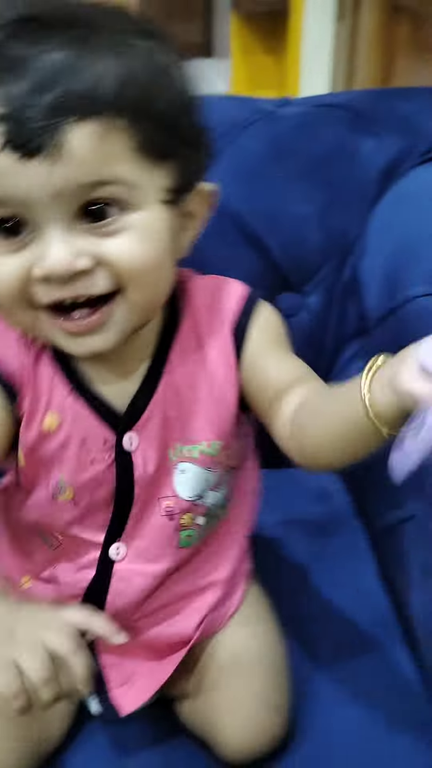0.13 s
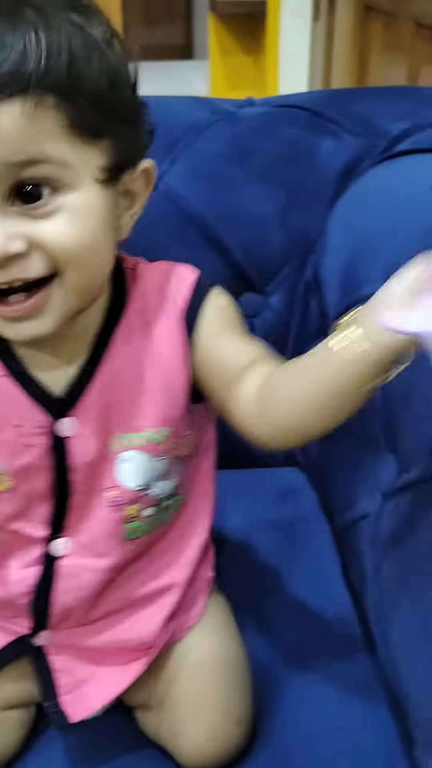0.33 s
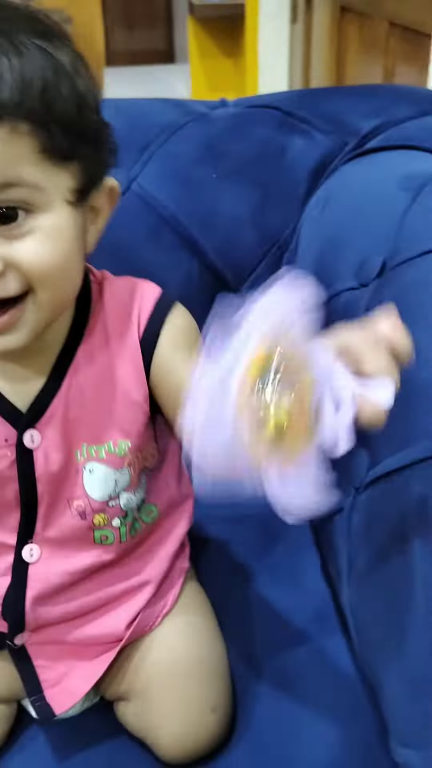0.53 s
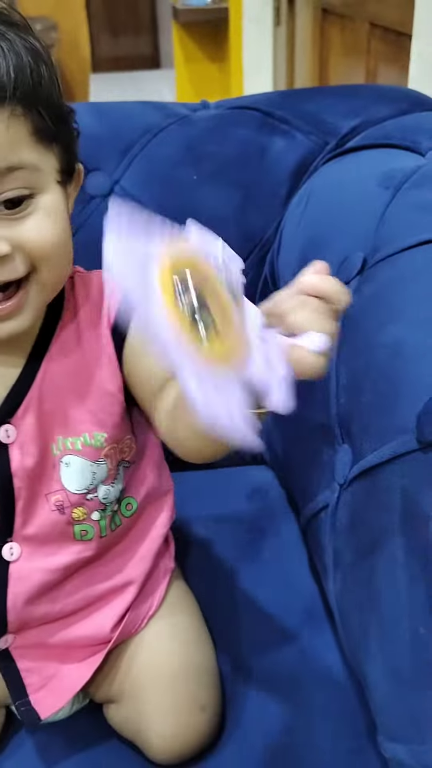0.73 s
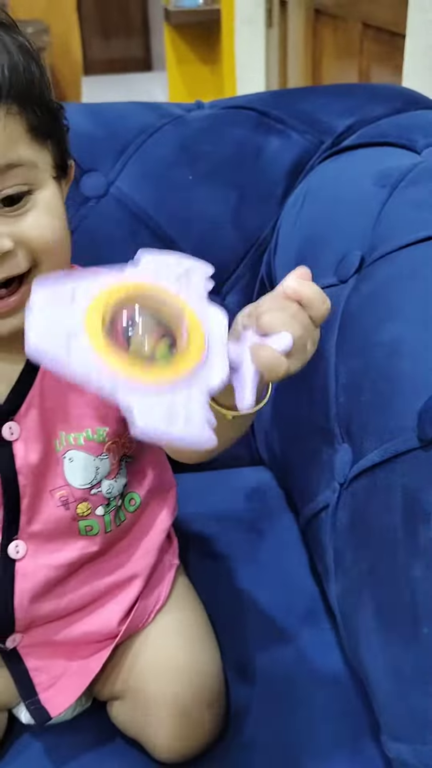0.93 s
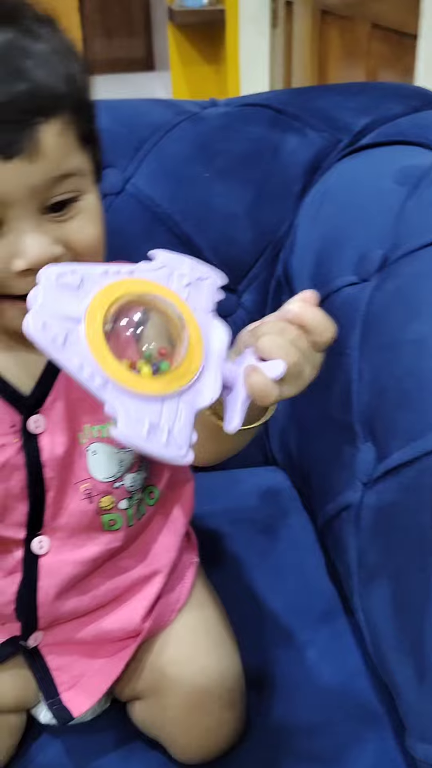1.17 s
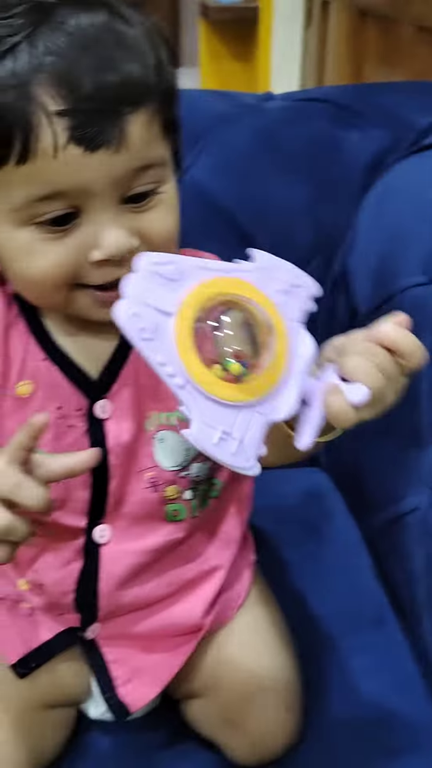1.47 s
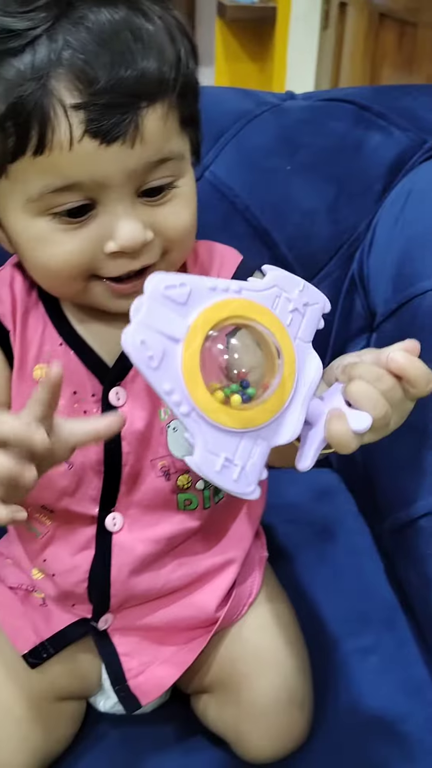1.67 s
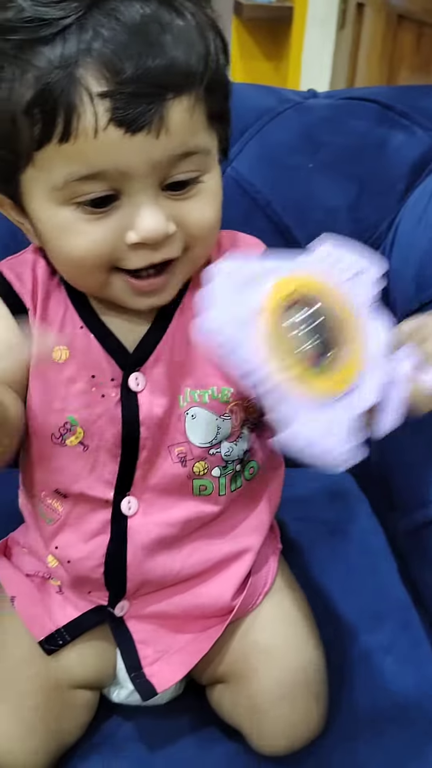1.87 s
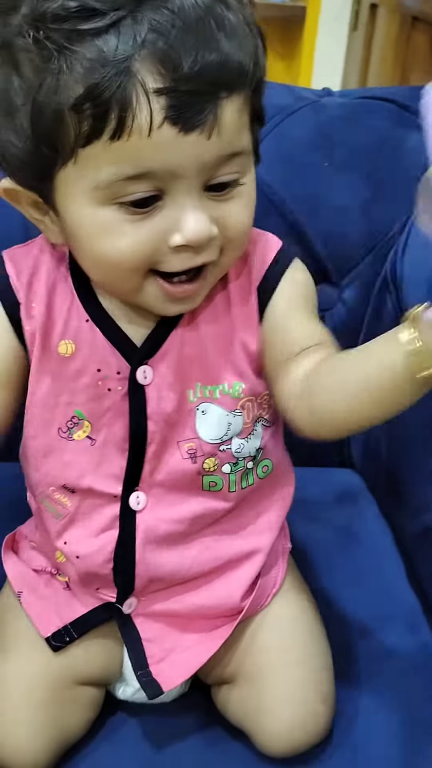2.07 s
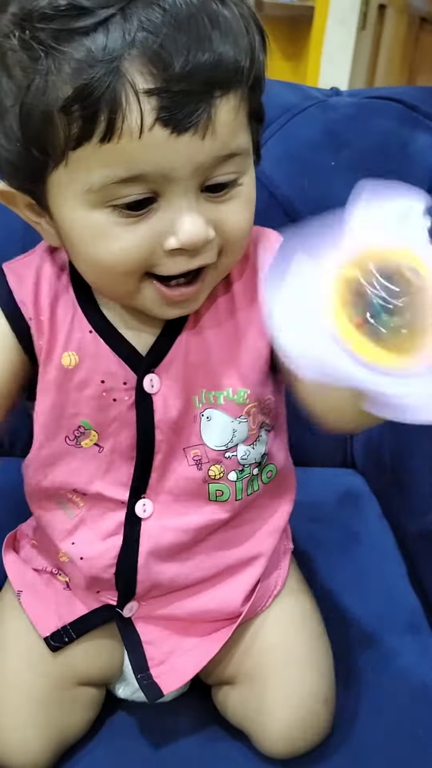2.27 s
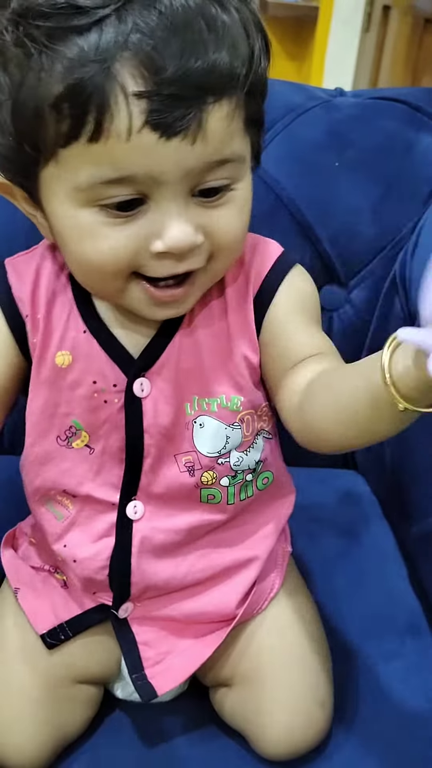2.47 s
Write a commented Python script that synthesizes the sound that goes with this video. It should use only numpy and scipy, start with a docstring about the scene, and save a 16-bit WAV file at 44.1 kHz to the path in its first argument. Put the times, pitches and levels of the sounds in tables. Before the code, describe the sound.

A plastic rattle full of tiny beads is shaken in two dry, hissing bouts in a living room

```python
"""Plastic bead rattle

A plastic rattle with loose beads is shaken in two bouts, left of a two-port microphone in a living room.
Each bead hit is a brief tick, with a weaker rebound, ringing the shell's high modes.
Between the bouts a few beads still tick; beads rolling along the wall rub its lower modes with noise.
Under it lies an unevenly surging room hum: shaped noise bands plus narrow resonances.
A gate lowers everything while the treble is quiet, and the top is cut."""
import sys
import numpy as np
from scipy import signal
from scipy.io import wavfile

SR = 44100
rng = np.random.default_rng(int(sys.argv[2]) if len(sys.argv) > 2 else 0)


def wav_record(signal):
    """Record a signal, one row per channel, as 16-bit PCM in the file named by sys.argv[1]."""
    frames = np.transpose(np.atleast_2d(signal))
    bounded = np.clip(frames, -1, 1)
    # unit amplitude maps onto the largest positive 16-bit level
    quanta = np.round(bounded * 32767).astype(np.int16)
    wavfile.write(sys.argv[1], SR, quanta)


N = 114660   # 2.6 s
RIGHT_LAG_S = .00037   # right port hears rattle and hum later


def from_db(db):
    """Decibels to gain."""
    return 10 ** (np.asarray(db) / 20)


def rms_one(x):
    """Scale to rms 1."""
    return x / np.sqrt(np.mean(x ** 2) + 1e-20)


def at_hz(points, hz):
    """Read a spectrum table on a log-frequency axis."""
    table_hz, value = np.array(points).T
    return np.interp(np.log(hz), np.log(table_hz), value)


def over_time(s, values):
    """Interpolate a time table to every sample."""
    return np.interp(np.arange(N) / SR, s, values)


def drift(corner_hz):
    """Random fluctuation of rms 1: noise through two equal poles, computed every 40 samples."""
    step = 40
    r = np.exp(-2 * np.pi * corner_hz * step / SR)
    noise = rng.standard_normal(N // step + 2002)
    slow = signal.lfilter([1], [1, -2 * r, r * r], noise)[2000:]   # drop the run-in
    return np.interp(np.arange(N) / step, np.arange(len(slow)), rms_one(slow))


def ring(drive, hz, t60_s):
    """One resonance passed twice: a click gives a rounded burst of height about 1."""
    r = from_db(-60 / (max(t60_s, .001) * SR))   # t60 of one pass, 1 ms at least
    w = 2 * np.pi * hz / SR
    poles = [1, 0, 0, 1, -2 * r * np.cos(w), r * r]
    height = 2 * np.e * (1 - r) * np.sin(w) ** 2
    return height * signal.sosfilt([poles, poles], drive + 1e-18)


# vigour of the shaking: t/s, relative level/dB, left minus right/dB
SHAKING = [(0, -31.5, 3), (0.06, -32, 3), (0.1, -26.5, 2.5), (0.14, -25, 3.5), (0.2, -30.5, 4),
           (0.24, -23.5, 7), (0.27, -24, 0), (0.3, -23.5, 8), (0.34, -27.5, 5), (0.39, -34, 4),
           (0.43, -31, 7), (0.48, -29, 4), (0.52, -23, 0.5), (0.57, -26.5, 1.5), (0.61, -29, 3),
           (0.635, -27.5, 8), (0.655, -27.5, 3), (0.69, -24, 8), (0.75, -30, 3), (0.82, -32.5, 8),
           (0.87, -39.5, 6), (0.92, -35.5, 1), (0.97, -35, 1), (1.04, -31.5, 9), (1.1, -33.5, 3),
           (1.17, -41, 3.5), (1.29, -42.5, 2.5), (1.35, -54.5, 3), (1.42, -56, 1), (1.456, -52.5, 5),
           (1.52, -55, 1), (1.6, -54.5, 1.6), (1.65, -51, 1), (1.72, -55.5, 5), (1.85, -65, 4),
           (1.96, -67, 0), (2.06, -58, 14.5), (2.12, -55.5, 11), (2.15, -47.5, 10), (2.165, -41.5, 4),
           (2.22, -35, 10), (2.29, -41.5, 3), (2.315, -37, 11), (2.333, -24, 17.5), (2.36, -30.5, 2),
           (2.41, -28.5, 12), (2.46, -33.5, 7), (2.52, -32.5, 5), (2.6, -33.5, 0)]
SWARM_DB = 2.5   # added to the table
TICKS_PER_S, TICK_SPREAD_DB = 1800, 2.8   # median rate; mean of the exponential size draw before its cap
CLUMP_DB, CLUMP_HZ = 1.5, 59.47   # fluctuation of the tick rate: rms, corner


def swarm():
    """Beads tumble and tick at random, in clumps, mostly small with a few large."""
    s, level_db, pan_db = np.transpose(SHAKING)
    chance = rng.random(N)
    size = np.minimum(rng.exponential(1, N), 4)
    ticks_per_s = TICKS_PER_S * from_db(CLUMP_DB * drift(CLUMP_HZ))
    born = np.flatnonzero(chance < ticks_per_s / SR)
    left, right = shell(born / SR, from_db(TICK_SPREAD_DB * size[[born, born]]))
    level = SWARM_DB + over_time(s, level_db)
    half_pan = over_time(s, pan_db) / 2
    return from_db([level + half_pan, level - half_pan]) * [rms_one(left), rms_one(right)]


# single bead hits that stand out, from loud ones to the small ticks of the pause:
# t/s, relative level/dB, left minus right/dB
SINGLE_HITS = [(0.0447, -15.3, 8.7), (0.0714, -14.1, 6.7), (0.1415, -12.6, -4.4), (0.2406, -9.6, -2.7),
               (0.2442, -9.6, 11.8), (0.2611, -10.9, -0.3), (0.2682, -12.9, -4.9), (0.2856, -6.9, 11.9),
               (0.2995, -8.5, 10.8), (0.3081, -10.1, 15.2), (0.3109, -10.5, 12.1), (0.3166, -8.5, 14.0),
               (0.3244, -10.2, 8.4), (0.3403, -13.0, 16.7), (0.3536, -17.1, 14.2), (0.3634, -15.6, 14.2),
               (0.371, -13.5, 9.2), (0.393, -18.3, 8.9), (0.3997, -13.1, 9.4), (0.4202, -12.0, 17.2),
               (0.4218, -16.8, 10.2), (0.441, -15.7, 11.5), (0.4425, -13.6, 15.9), (0.4632, -14.6, 14.1),
               (0.4871, -13.2, 14.4), (0.4957, -15.5, 10.2), (0.5005, -11.7, 16.3), (0.5049, -12.9, 10.3),
               (0.5096, -15.0, 13.4), (0.5122, -10.8, 11.4), (0.5196, -12.7, 10.4), (0.5212, -11.5, 13.2),
               (0.5317, -11.3, 8.7), (0.5392, -7.9, 12.6), (0.5412, -13.2, 13.1), (0.5593, -12.9, 10.1),
               (0.5698, -17.0, 13.9), (0.5769, -13.1, 9.6), (0.5839, -15.6, 11.2), (0.5856, -11.0, 11.5),
               (0.5932, -13.8, 12.0), (0.597, -14.6, 12.2), (0.6146, -10.4, 13.7), (0.6211, -13.6, 12.8),
               (0.6262, -9.1, 10.7), (0.6281, -6.8, 12.1), (0.6372, -4.7, 9.3), (0.6395, -10.9, 0.6),
               (0.6557, -9.3, 3.1), (0.6698, -7.7, -5.4), (0.6943, -10.4, -2.8), (0.6965, -9.1, -1.1),
               (0.7109, -11.1, 7.6), (0.7163, -11.6, -3.8), (0.7244, -12.3, 12.7), (0.7316, -11.9, 7.7),
               (0.748, -11.5, 1.9), (0.7786, -13.8, 11.8), (0.7804, -15.3, 10.4), (0.7881, -17.4, 12.9),
               (0.8026, -15.1, 10.4), (0.8222, -18.7, 18.3), (0.8243, -16.4, 11.2), (0.8289, -18.9, 16.7),
               (0.8408, -17.9, 21.3), (0.8442, -18.8, 11.3), (0.8555, -20.0, 12.8), (0.8715, -23.6, 15.3),
               (0.8742, -4.0, 10.5), (0.8757, -16.0, 3.1), (0.8972, -7.5, 7.5), (0.8985, -18.4, -0.4),
               (0.9071, -16.6, 8.0), (0.9163, -10.9, 18.0), (0.9328, -16.1, 13.9), (0.9346, -8.0, 12.7),
               (0.9449, -14.9, 12.9), (0.9483, -15.3, 12.5), (0.976, -9.0, 12.0), (0.9777, -12.8, 8.2),
               (0.9991, -17.6, 14.7), (1.0032, -11.5, 14.5), (1.0109, -13.5, 15.6), (1.0253, -18.0, 13.1),
               (1.0287, -17.2, 12.0), (1.0402, -15.3, 17.1), (1.0499, -15.7, 11.3), (1.0632, -15.1, 14.6),
               (1.0658, -15.0, 11.4), (1.0789, -16.7, 15.7), (1.0932, -20.2, 14.4), (1.1139, -19.3, 15.1),
               (1.1335, -24.0, 10.0), (1.1468, -21.5, 6.1), (1.16, -26.0, 10.0), (1.174, -27.0, 10.0),
               (1.217, -27.0, 10.0), (1.2291, -25.4, 10.8), (1.241, -27.0, 10.0), (1.2591, -26.7, 11.6),
               (1.2706, -27.6, 12.9), (1.4501, -34.0, 11.6), (1.4555, -37.0, 8.0), (1.467, -38.0, 8.0),
               (1.552, -40.0, 6.0), (1.627, -38.0, 8.0), (1.736, -38.0, 6.0), (1.762, -41.0, 6.0),
               (1.815, -41.0, 6.0), (1.937, -40.0, 6.0), (2.156, -27.0, 9.0), (2.1696, -24.7, 9.2),
               (2.1809, -22.8, 6.9), (2.1877, -15.5, 8.2), (2.1966, -20.9, 10.8), (2.2152, -18.9, 17.2),
               (2.2246, -19.8, 9.8), (2.231, -17.1, 10.8), (2.2424, -21.1, 13.1), (2.2442, -22.3, 13.5),
               (2.2552, -20.7, 10.4), (2.2694, -20.5, 10.9), (2.2823, -23.8, 15.2), (2.3095, -22.0, 10.5),
               (2.3238, -12.1, 10.4), (2.333, -5.0, 9.7), (2.3364, -7.7, 11.0), (2.3378, -5.0, 10.6),
               (2.3788, -9.7, 12.6), (2.3956, -8.1, 7.3), (2.4008, -10.1, 15.2), (2.4085, -7.1, 10.4),
               (2.4103, -9.4, 6.7), (2.4211, -10.6, 11.2), (2.4242, -12.5, 10.3), (2.4362, -12.0, 8.1),
               (2.4427, -9.5, 10.9), (2.4441, -15.0, -1.9), (2.4514, -17.0, 14.2), (2.4798, -13.2, 2.9),
               (2.4868, -20.5, -7.5), (2.5004, -13.9, 6.7), (2.5022, -13.3, 11.7), (2.508, -17.8, 12.3),
               (2.5153, -15.9, 8.4), (2.5409, -13.9, 17.1), (2.5511, -14.6, -0.9), (2.58, -11.9, 8.2),
               (2.5881, -8.0, 11.0)]
HIT_DB = -2.0   # added to the table


def hits():
    """Single beads strike the shell at listed times, from loud hits to the small ticks of the pause."""
    s, hit_db, pan_db = np.transpose(SINGLE_HITS)
    level = HIT_DB + hit_db
    return shell(s, from_db([level + pan_db / 2, level - pan_db / 2]))


# shell modes at each port: f/Hz, left relative level/dB, right relative level/dB, one-pass t60/s
SHELL_MODES = [(7200, -33, -10, 0.0012), (7670, -48, -19.5, 0.004), (8210, -28.5, 2.5, 0.00093),
               (10260, -5, -25, 0.0013), (10226, -7, -9, 0.0047), (10210, 10, 10.5, 0.00046),
               (10670, -10, -11, 0.0055), (10840, -5, -3.5, 0.0007), (11950, 2, -23, 0.0004),
               (12440, -7.5, 4, 0.00073), (14900, -12, -6, 0.0012), (15600, -3.5, -9, 0.0006)]
LAG_SPREAD_S = .00004
BOUNCE_S, BOUNCE_DB = .0013, -9.0   # rebound: median delay, level re tick
MODE_SPREAD_DB = 3.0   # how a tick's colour varies
PORTS_ALIKE = 0.6   # how alike the two ports get a tick
TURN_DB, TURN_HZ = 3, 1.3   # as the rattle turns, each mode swells and fades: rms, corner
DETUNE = .01   # landing spot shifts the modes down, not at all or up by this share
HARD_ABOVE_HZ = 6160   # the tiny beads excite little below


def shell(s, size):
    """Ticks (sizes: left, right) and rebounds split among the modes at random, partly alike at the ports."""
    luck = rng.standard_normal((len(s), 2, len(SHELL_MODES) * 4 + 3))
    bounce_s = BOUNCE_S * np.exp(0.28 * luck[:, 0, -1])
    s = np.stack([s, s + bounce_s], axis=1).ravel()
    size = (size[:, :, None] * [1, from_db(BOUNCE_DB)]).reshape(2, -1)
    late = s + RIGHT_LAG_S + LAG_SPREAD_S * luck[:, :, -2].ravel()
    spot = np.digitize(luck[:, :, -3].ravel(), [-.43, .43]) - 1   # -1, 0, 1 about equally often
    common, other, flip, flip_other = luck[:, :, :-3].reshape(len(s), -1, 4).T
    turn_db = TURN_DB * np.array([drift(TURN_HZ) for _ in SHELL_MODES])
    modes_hz, left_db, right_db, modes_t60_s = np.transpose(SHELL_MODES)

    out = np.zeros((2, N))
    for port, (when, mode_db, share) in enumerate([(s, left_db, 1), (late, right_db, PORTS_ALIKE)]):
        at = np.clip(np.round(when * SR).astype(int), 0, N - 1)
        own = np.sqrt(1 - share ** 2)
        colour_db = MODE_SPREAD_DB * (share * common + own * other)
        strength = from_db(mode_db[:, None] + colour_db + turn_db[:, at])
        strength = strength / np.sqrt(np.sum(strength ** 2, axis=0))
        strength = strength * np.sign(share * flip + own * flip_other)
        for gain, hz, t60_s in zip(strength, modes_hz, modes_t60_s):
            for k in (-1, 0, 1):
                clicks = np.bincount(at, size[port] * gain * (spot == k), N)
                out[port] += ring(clicks, hz * (1 + DETUNE * k), t60_s)
    return signal.sosfilt(signal.butter(6, HARD_ABOVE_HZ, "high", fs=SR, output="sos"), out)


# low shell modes rubbed by rolling beads: f/Hz, relative level/dB, one-pass t60/s
RUBBED_MODES = [(4600, -7, .0015), (5200, 0, .002), (6000, -3, .0012), (6800, -1, .0012)]
ROLL_DB, ROLL_FOLLOWS = -52, 0.28   # offset at a vigour of -30 dB; share of the vigour's swing
ROLL_FLICKER_DB, ROLL_FLICKER_HZ = 2.0, 35   # rms, corner


def rolling():
    """Beads sliding along the wall rub the low modes with flickering noise, different at each port."""
    s, vigour_db, _ = np.transpose(SHAKING)
    rub = rng.standard_normal((2, N)) * from_db(ROLL_FLICKER_DB * drift(ROLL_FLICKER_HZ))
    rubbed = sum(from_db(db) * rms_one(ring(rub, hz, t60_s)) for hz, db, t60_s in RUBBED_MODES)
    level_db = ROLL_DB + ROLL_FOLLOWS * (over_time(s, vigour_db) + 30)
    return from_db(level_db) * rms_one(rubbed)


ROOM_T60_S, ROOM_DB = .18, -12.0   # tail energy re direct sound


def room(x):
    """Add a diffuse tail: convolution with decaying noise, different for each port."""
    t = np.arange(SR // 2) / SR
    tail = rng.standard_normal((2, len(t))) * from_db(-60 * t / ROOM_T60_S) * (t > .003)
    tail = from_db(ROOM_DB) * tail / np.sqrt(np.sum(tail ** 2, axis=1, keepdims=True))
    return x + signal.fftconvolve(x, tail, axes=1)[:, :N]


# room hum spectrum: f/Hz, relative level/dB per Hz
HUM_SPECTRUM = [(24, -62), (40, -20), (69, -16), (87, -7), (204, -8), (220, -6), (249, -2), (283, -6.5),
                (412, -3.5), (510, -6.5), (560, -10), (831, -9), (1240, -10), (1370, -10.5), (2320, -13.5),
                (4680, -23.5), (10200, -14.5), (16000, -58)]
# correlation of the ports apart from the lag: f/Hz, likeness/1
PORT_LIKENESS = [(60, 0.97), (200, 1), (400, 1), (700, 0.16), (1300, 0.37), (3000, 0.45), (8000, 0.39)]
# hum balance: f/Hz, left minus right/dB
HUM_PAN = [(60, 3), (180, -3.5), (550, -1.5), (1650, 0), (4970, 1), (15000, 4.5)]
HUM_DB = -45.5   # rms of the noise bands before the gate
HUM_PATCHY_DB, HUM_PATCHY_HZ = 1.1, 36   # fluctuation per band: rms, corner


def hum():
    """Quarter-octave bands of stereo noise, most alike at the ports in the bass; the right lags."""
    out, edges_hz = 0, 30 * 2 ** np.arange(0, 9.3, 1 / 4)
    white = rng.standard_normal((2, 2, N + SR // 2))   # with a run-in
    for k, (low, high) in enumerate(zip(edges_hz, edges_hz[1:])):
        band = signal.butter(2, [low, high], "band", fs=SR, output="sos")
        mid, side = signal.sosfilt(band, white[k % 2])[:, -N:]   # neighbours use separate noise
        hz = np.sqrt(low * high)
        alike = np.clip(at_hz(PORT_LIKENESS, hz), -1, 1)
        half_pan = at_hz(HUM_PAN, hz) / 2
        level_db = at_hz(HUM_SPECTRUM, hz) + HUM_PATCHY_DB * drift(HUM_PATCHY_HZ)
        gain = from_db(level_db) * from_db([[half_pan], [-half_pan]]) * surge(hz)
        out = out + gain * (np.sqrt(1 + alike) * mid + np.sqrt(1 - alike) * side * [[1], [-1]])
    out[1] = np.roll(out[1], int(RIGHT_LAG_S * SR))
    return from_db(HUM_DB) * rms_one(out)


# resonances standing out of the hum: f/Hz, rms level before surge and gate/dB, one-pass t60/s
HUM_RESONANCES = [(101.1, -63, 0.19), (127, -64.5, 0.33), (194.1, -64, 0.18), (245.1, -63.5, 0.13),
                  (435.6, -59.5, 0.14), (498.5, -65, 0.11), (1625, -61, 0.029), (2320, -62, 0.019)]


def hum_tones():
    """Noise through narrow resonances, most alike at the ports in the bass; the right lags."""
    out = 0
    for hz, db, t60_s in HUM_RESONANCES:
        noise = rng.standard_normal((2, N + SR))   # with a run-in
        mid, side = rms_one(ring(noise, hz, t60_s)[:, SR:])
        alike = np.clip(at_hz(PORT_LIKENESS, hz), 0, 1)
        right = np.roll(alike * mid + np.sqrt(1 - alike ** 2) * side, int(RIGHT_LAG_S * SR))
        out = out + from_db(db) * surge(hz) * np.array([mid, right])
    return out


# uneven surging of the low hum: t/s, low band relative level/dB, middle band/dB, high band/dB
HUM_SURGE = [(0, -7, -4.5, -0.5), (.16, 4, 2.5, 1), (.24, -1, -1.5, -1), (.36, 3.5, 1, 0),
             (.54, -1, -1.5, -0.5), (.7, -2, -3, -5), (.83, 4, 3, -2.5), (1.05, 1.5, 2, -1.5),
             (1.2, 1, -0.5, -0.5), (1.36, -1.5, 2, 1), (1.7, -3, -2.5, -3), (1.96, 0, 3.5, 0.5),
             (2.12, -1.5, -1, 3), (2.19, 1, 4, -1), (2.28, 2, 0, 2.5), (2.45, -0.5, -1.5, 0),
             (2.57, 1, 0, -0.5)]
# upper edges of those three bands: f/Hz
SURGE_TOPS_HZ = (160, 330, 560)


def surge(hz):
    """Gain over time of the hum at this frequency; steady above the top band."""
    s, *levels_db = np.transpose(HUM_SURGE)
    band = np.searchsorted(SURGE_TOPS_HZ, hz)
    return from_db(over_time(s, levels_db[band])) if band < len(levels_db) else 1


def scene():
    """Rattle in the room, over the hum."""
    return room(swarm() + hits() + rolling()) + hum() + hum_tones()


GATE_AT_DB, GATE_KNEE_DB, GATE_DEPTH_DB = -45, 1.5, -5.5   # treble level at half depth, softness, full cut
GATE_LISTEN_S, GATE_ABOVE_HZ = 0.0073, 6700
CUTOFF_HZ = 15700


def record(dry):
    """A gate lowers the gain while the treble is quiet; a steep low-pass cuts the top."""
    treble = signal.sosfilt(signal.butter(2, GATE_ABOVE_HZ, "high", fs=SR, output="sos"), dry)
    power = np.mean(treble ** 2, axis=0)
    r = np.exp(-1 / (GATE_LISTEN_S * SR))
    smooth_power = signal.lfilter([1 - r], [1, -r], power, zi=[power[:2000].mean()])[0]
    level_db = 10 * np.log10(smooth_power + 1e-12)
    cut_db = GATE_DEPTH_DB / (1 + np.exp((level_db - GATE_AT_DB) / GATE_KNEE_DB))
    gated = dry * from_db(cut_db)
    return signal.sosfilt(signal.ellip(10, .5, 65, CUTOFF_HZ, fs=SR, output="sos"), gated)


dry = scene()
out = record(dry)
wav_record(out)
```